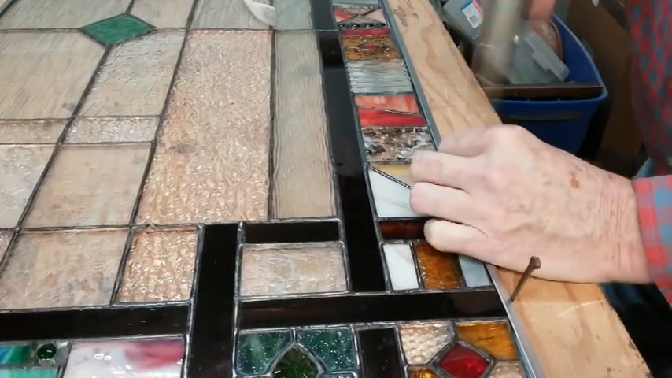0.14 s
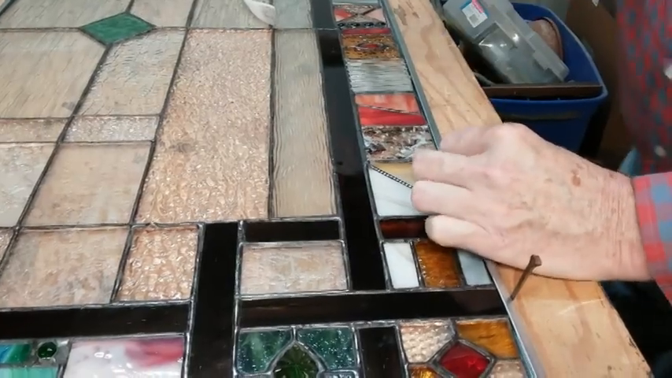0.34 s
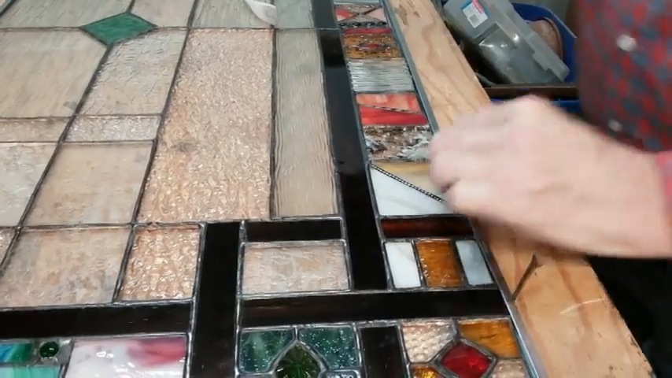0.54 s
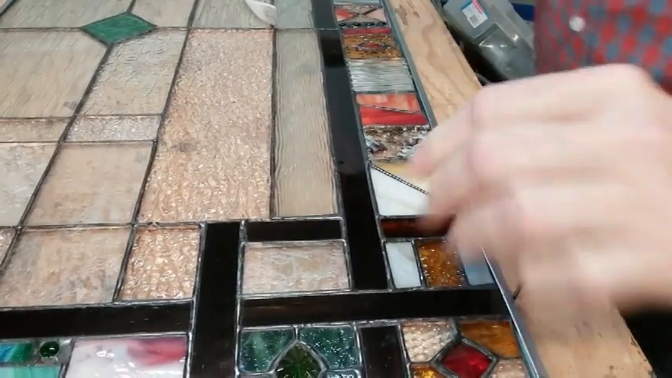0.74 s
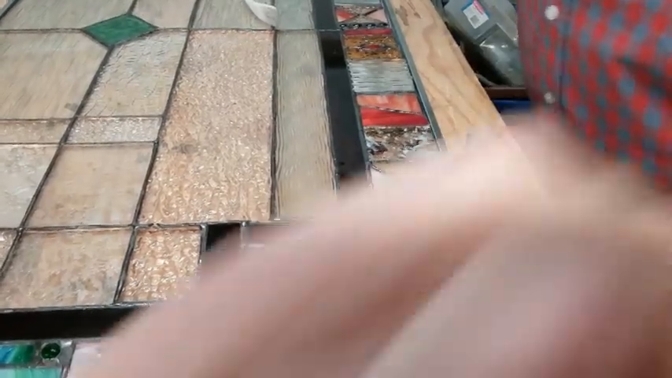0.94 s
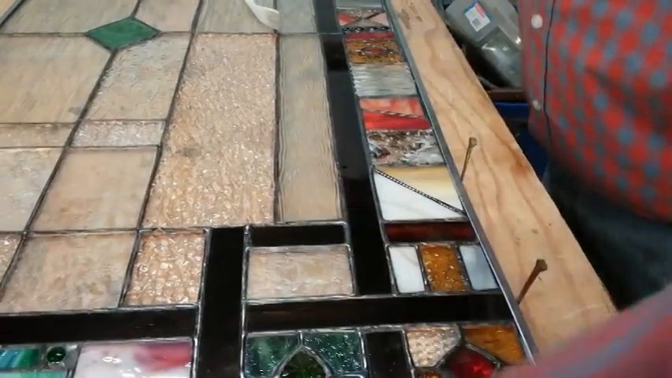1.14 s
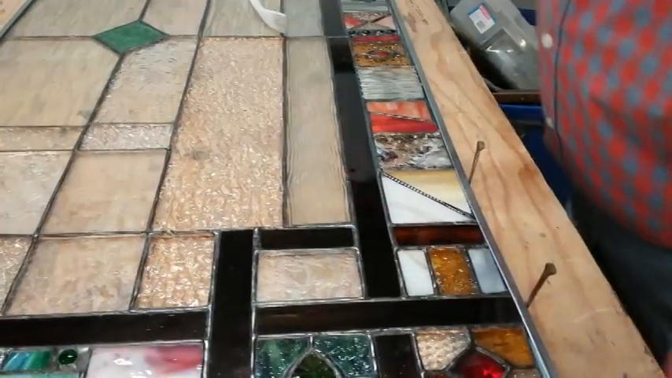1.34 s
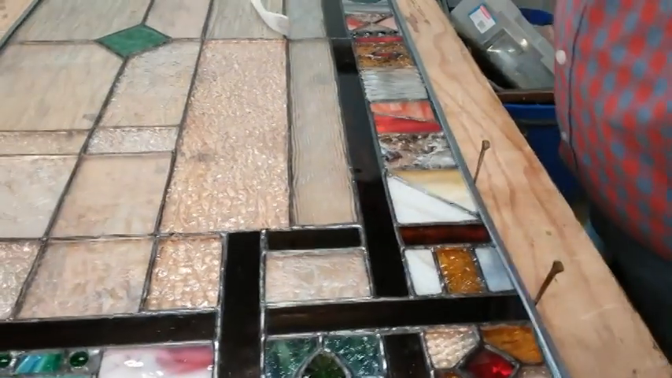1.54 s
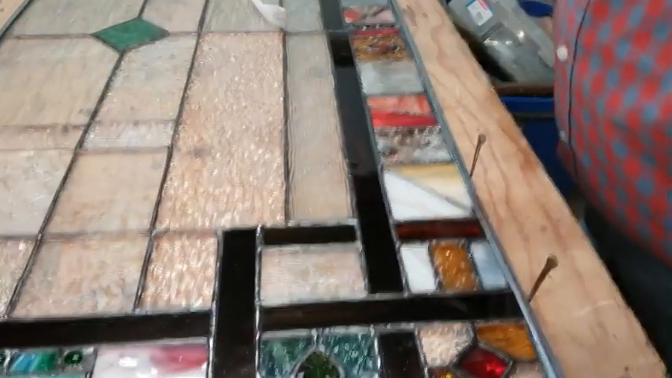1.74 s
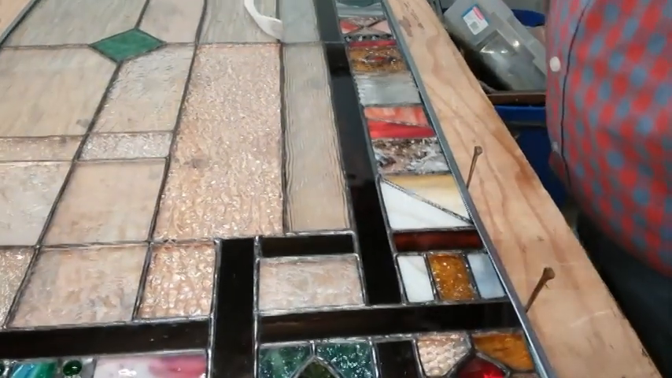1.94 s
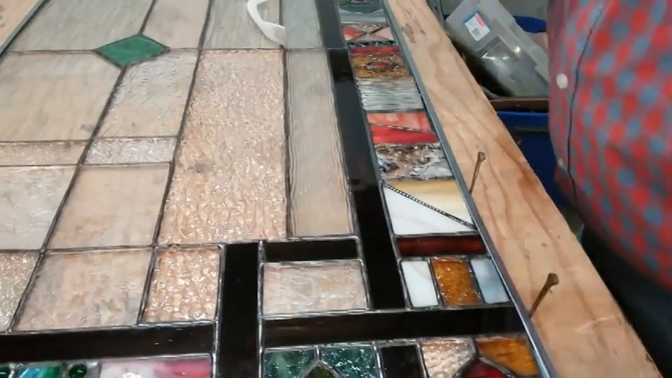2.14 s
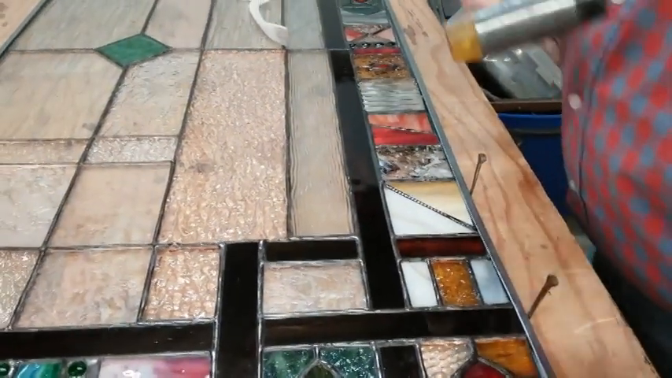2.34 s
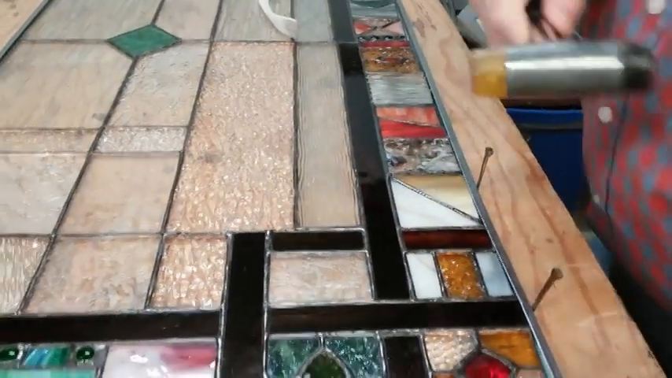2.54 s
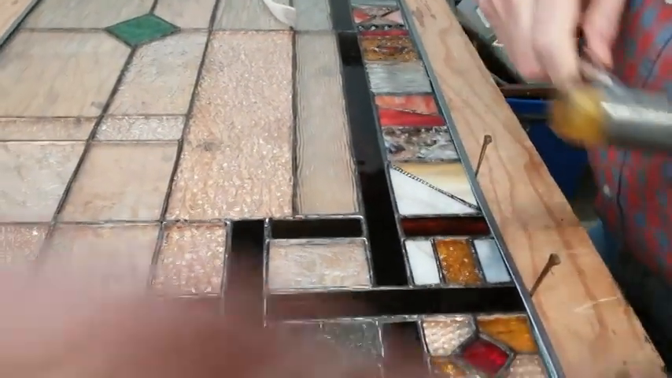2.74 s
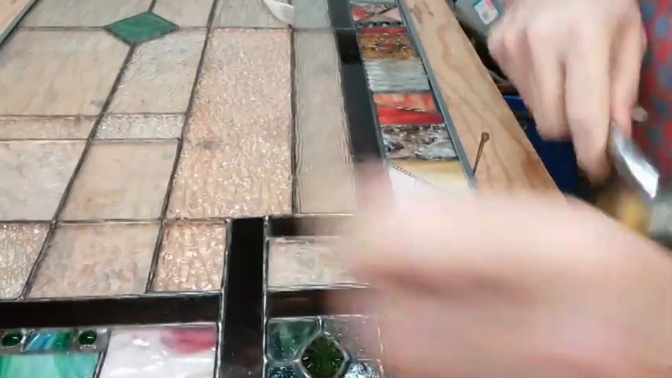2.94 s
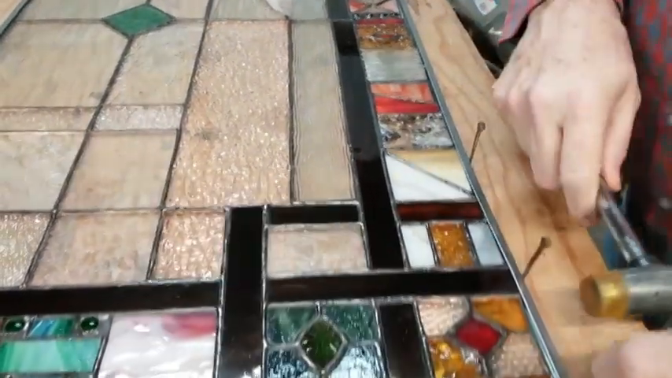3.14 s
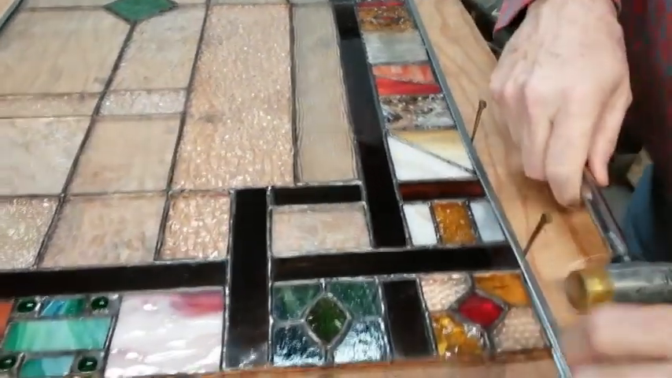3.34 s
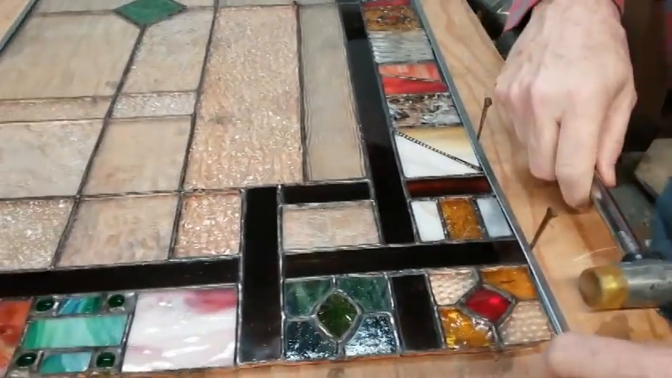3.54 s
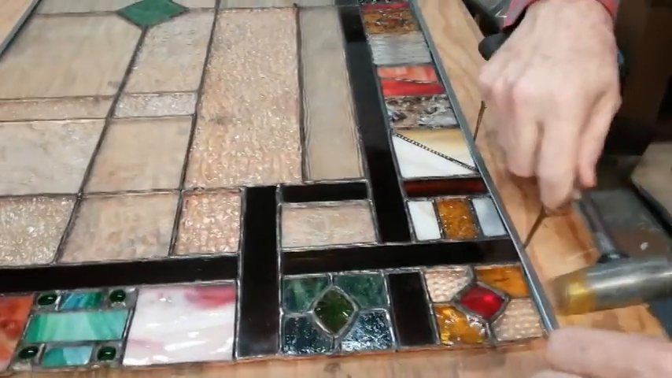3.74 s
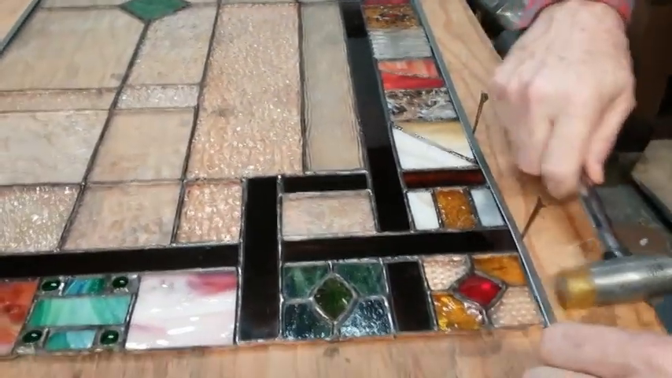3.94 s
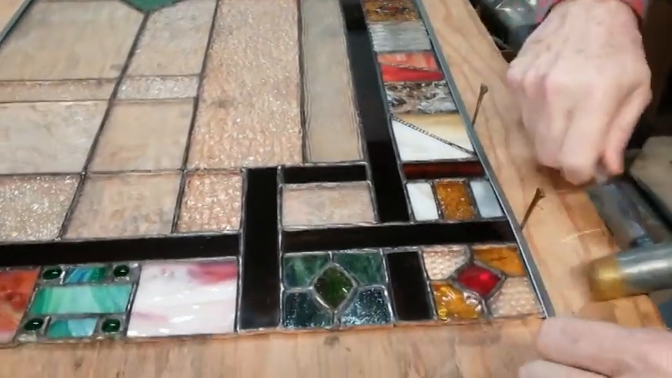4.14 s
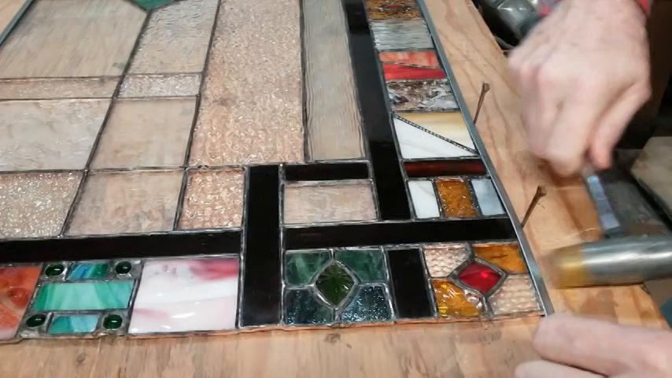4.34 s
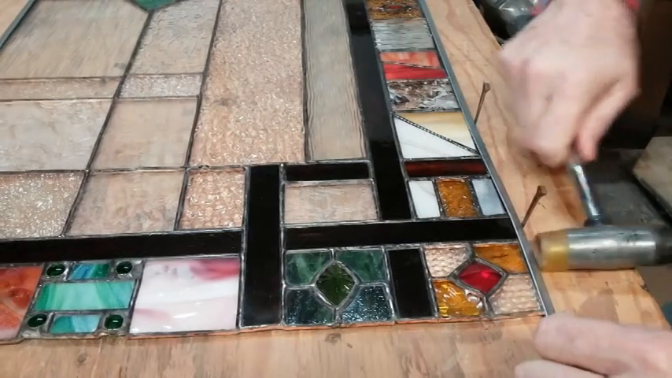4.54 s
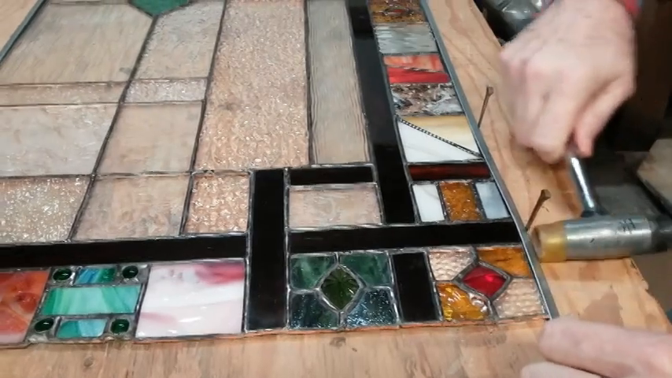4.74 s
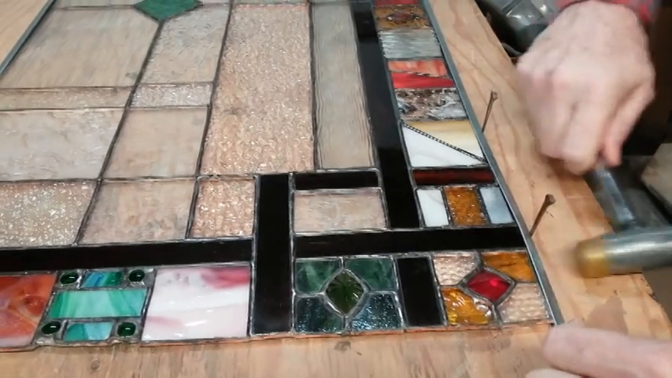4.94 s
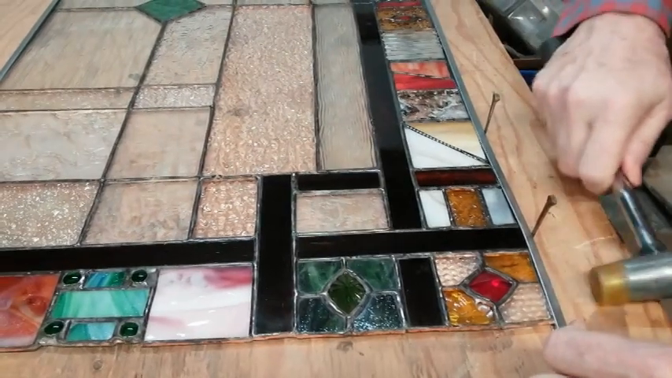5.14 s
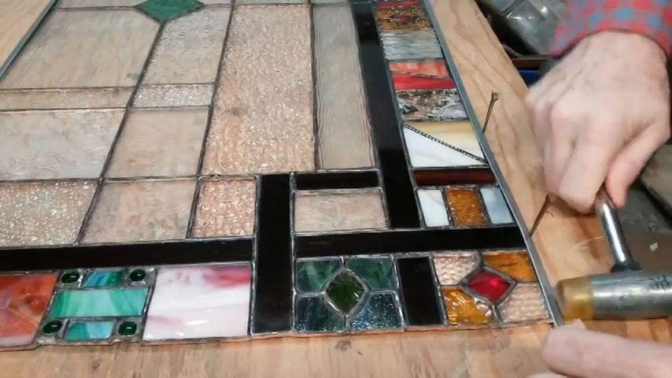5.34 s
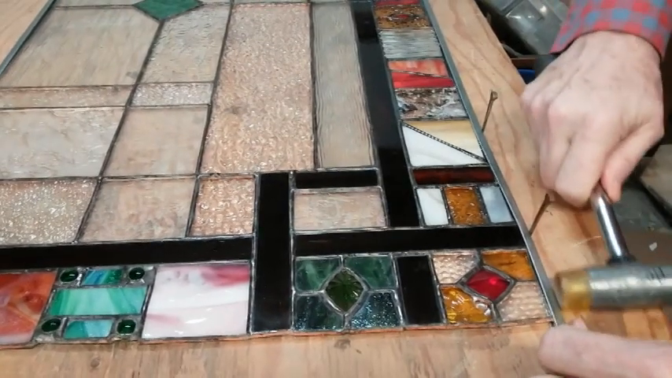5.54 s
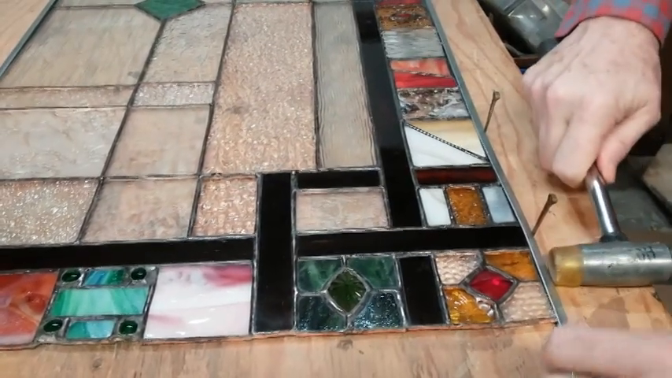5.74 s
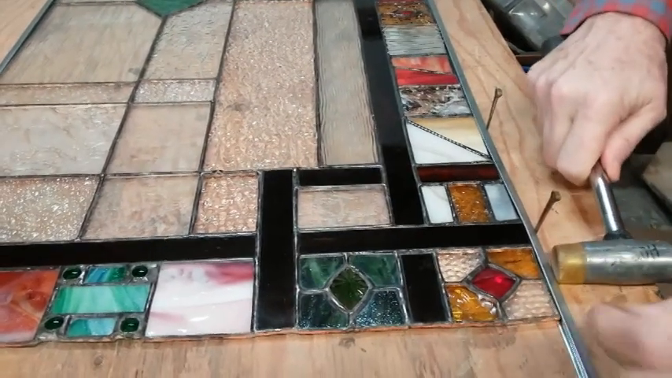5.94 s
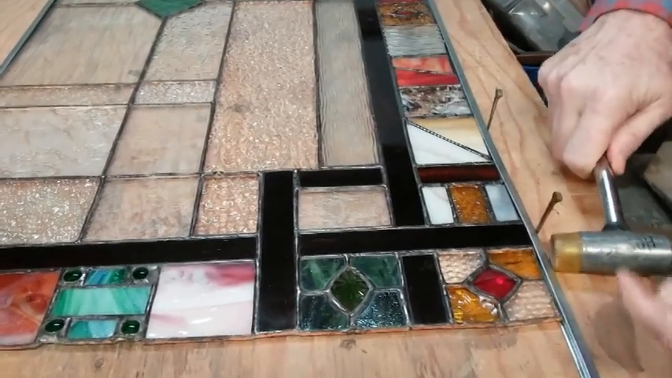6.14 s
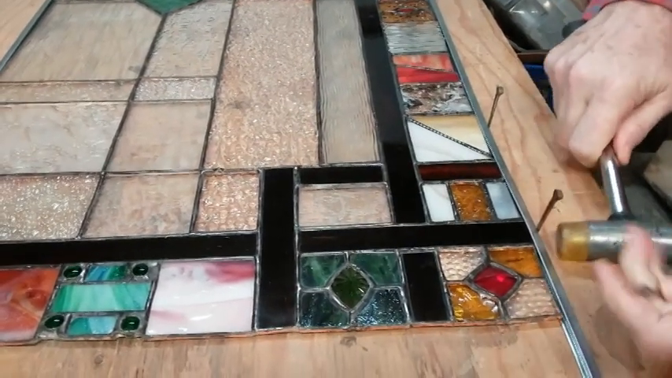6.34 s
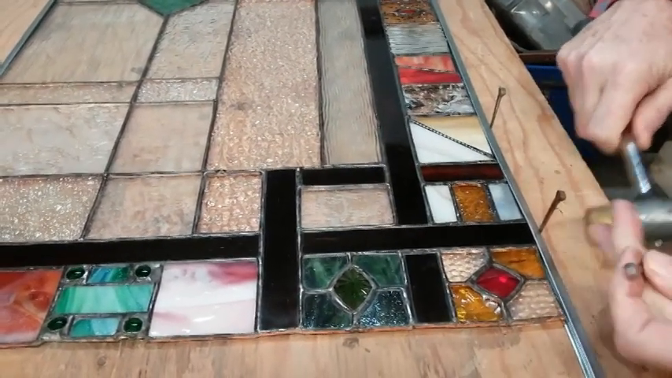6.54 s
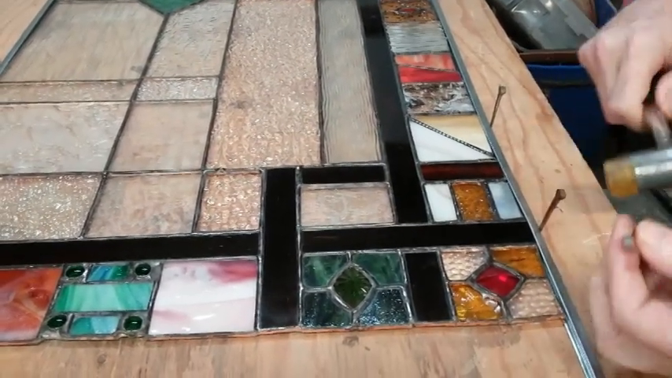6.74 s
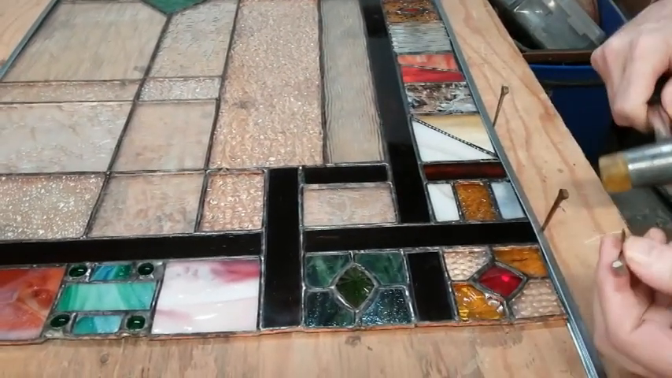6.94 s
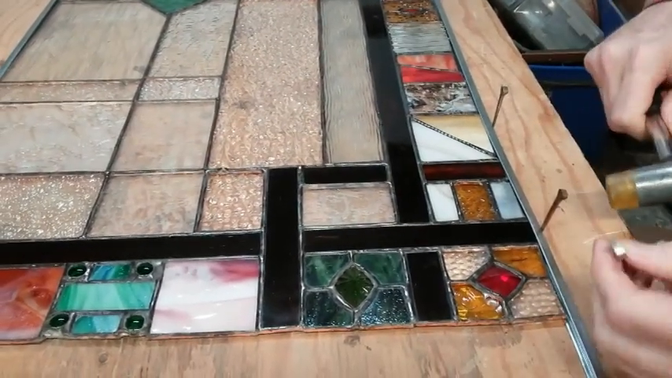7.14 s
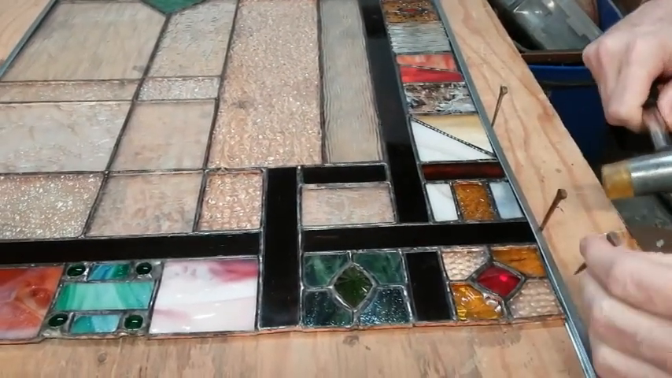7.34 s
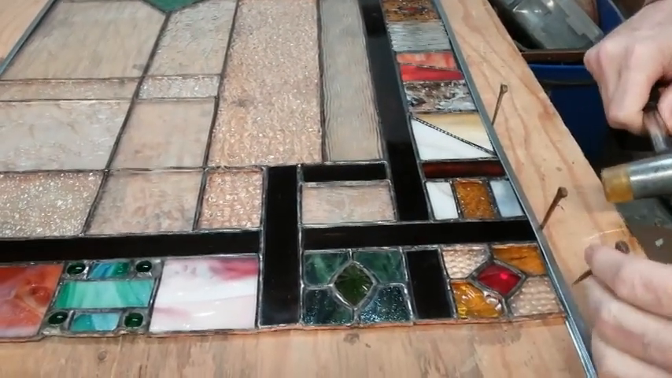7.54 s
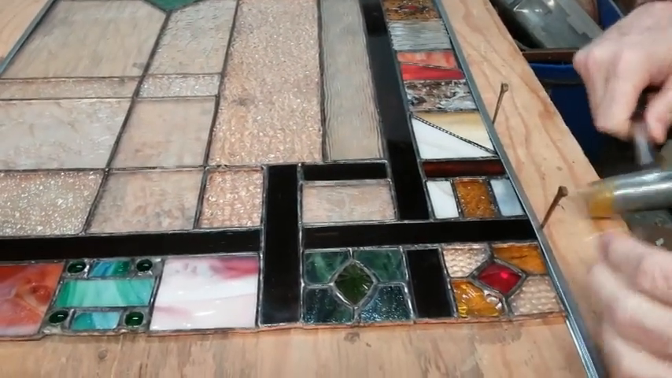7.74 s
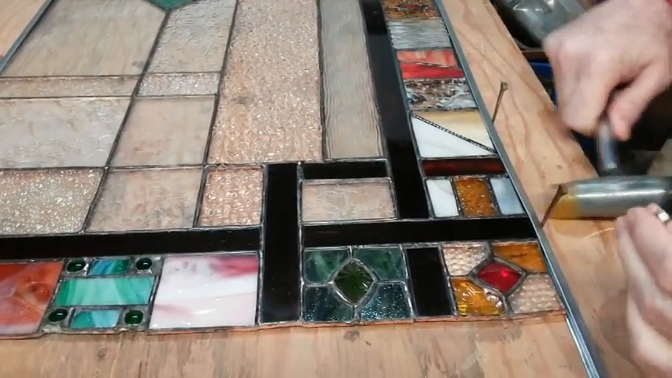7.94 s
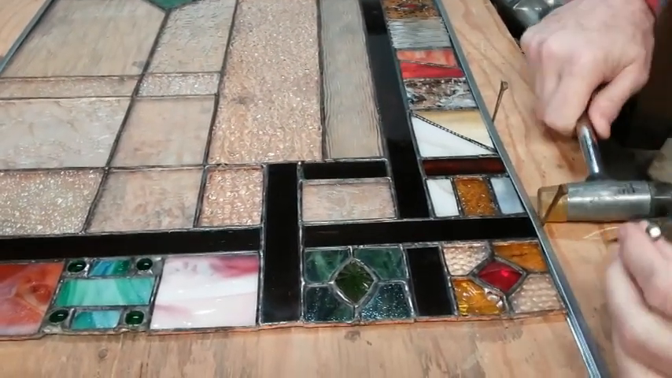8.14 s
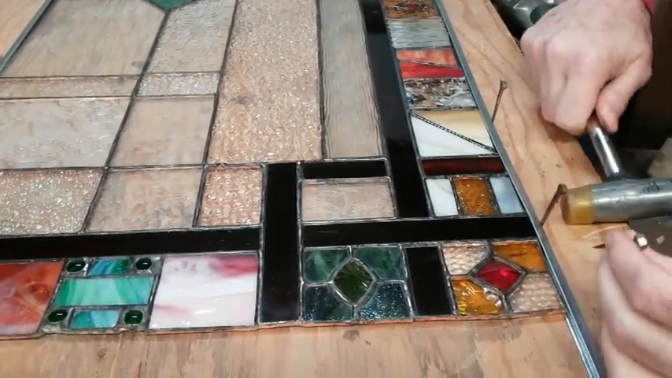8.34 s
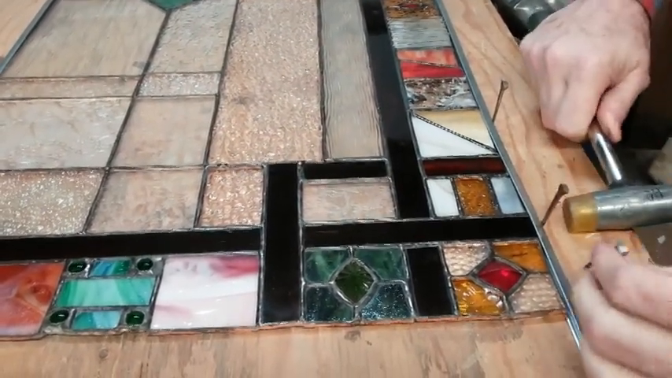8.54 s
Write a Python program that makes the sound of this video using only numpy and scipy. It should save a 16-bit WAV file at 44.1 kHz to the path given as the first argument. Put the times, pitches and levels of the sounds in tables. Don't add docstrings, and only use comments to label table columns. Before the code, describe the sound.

A workshop hums low, with hiss and a faint distant whir. At the start a hammer blow is already dying away; at 0.3 s another sharp, loud woody blow cracks close by and rings for about half a second. Faint scuffs follow until, from 1.4 to 2.5 s, a hand rummages in loose nails: dense, bright clacking, snaps and rubbing. Around 2.6-2.95 s a tool slides over wood with a brief rising scrape. Soft thuds come at 3.4 and 3.6 s, with clatter on the bench near 3.75 s. From 3.9 to 5.4 s the hammer strikes roughly every quarter second, strongest from 4.3 s, with knocks, board thuds, slight steel ticks and small bounces. From 5.5 to 6.8 s fingers fidget quietly with tools. The whir runs down around 7 s, leaving hum. Soft, dull thuds come near 7.9, 8.1 and 8.3 s amid light rubbing.

```python
import sys
import numpy as np
from scipy import signal
from scipy.fft import rfft, irfft
from scipy.io import wavfile
from scipy.ndimage import uniform_filter1d

SR = 44100
rng = np.random.default_rng(int(sys.argv[2]) if len(sys.argv) > 2 else 0)


def transcribe(u):
    v = np.clip(np.atleast_2d(u).T, -1, 1)
    q = np.round(v * 32767).astype(np.int16)
    wavfile.write(sys.argv[1], SR, q)


def to_linear_factor(level_db):
    exponent = np.asarray(level_db, float) / 20
    return 10 ** exponent


N = 379701
LEAD = SR // 5

# (frequency [Hz], density [dB per Hz])
AIR_SPECTRUM = [(15, -83.5), (25, -46.5), (58, -1), (123, -2), (174, -6.5), (194, -15.5), (255, -9),
                (382, -23.5), (449, -16.5), (791, -18.5), (1470, -21.5), (1980, -29), (5090, -44),
                (15800, -36.5)]
# (time [s], level [dB])
HUM_LEVEL = [(0, -54.5), (.7, -58.5), (1.4, -58.5), (2.3, -45.5), (3.3, -47.5), (5.7, -46.5), (6.7, -49),
             (7.85, -48.5), (8.61, -46)]
HISS_DB, HISS_WAKE_S, HISS_SAG_DB_PER_S = -3.5, 1.5, 0.62
WHIR_DB, WHIR_SAG_DB_PER_S, WHIR_STOP_S, WHIR_FADE_S = 6.5, 0.22, 7.38, 0.64
PATCHY_DB = 0.9

# (frequency [Hz], t60 [s])
ROOM_DECAY = [(100, 0.52), (300, 0.4), (1000, 0.36), (2500, 0.42), (5000, 0.35), (10000, 0.35),
              (16000, 0.25)]
# (frequency [Hz], width [Hz], added level [dB])
MIC_PORT = (4650, 420, -1)

# (frequency [Hz], level [dB], t60 [s])
BOARD_MODES = [(112.5, -18, 0.32), (168.2, -3, 0.094), (202.7, -1.5, 0.077), (272.7, -6, 0.11),
               (339.4, -3.5, 0.1), (385.8, -3, 0.063), (445.7, -8, 0.078), (547.6, -4, 0.045),
               (612.3, -7.5, 0.053), (720, -10.5, 0.044)]
# (frequency [Hz], level [dB], t60 [s])
WOOD_MODES = [(937, -1, 0.022), (1190, -3, 0.024), (1360, -5, 0.019), (1544, 5, 0.015), (1970, -1, 0.016),
              (2390, -10.5, 0.02), (2550, -22, 0.016), (3540, -30, 0.011)]
# (frequency [Hz], level [dB], t60 [s])
STEEL_MODES = [(4300, -15.5, 0.0028), (4652, -11, 0.012), (5040, -12.5, 0.0057), (5800, -14, 0.0015)]
# (frequency [Hz], level [dB], t60 [s])
EDGE_MODES = [(6830, -2, 0.008), (8540, -2, 0.011), (9150, -3.5, 0.0063), (10500, -3.5, 0.0044),
              (11440, -11.5, 0.0075), (13800, -8.5, 0.0023), (14500, -14, .002)]
# (frequency [Hz], width [Hz], level [dB])
TRAY_PEAKS = [(750, 800, 3), (1258, 120, 9.5), (2000, 650, 14), (2460, 150, -19.5), (3380, 930, -25)]
# (frequency [Hz], width [Hz], level [dB])
BENCH_PEAKS = [(75, 62, 0)]
# (share of the pitch [ratio], level [dB], t60 [s])
CLATTER_MODES = [(.25, -17.5, 0.027), (.62, 0.5, 0.0064), (.82, -21.5, 0.011), (1.01, 10, 0.0077),
                 (1.25, 3.5, 0.002), (1.45, -40.5, 0.0039)]
# (frequency [Hz], level [dB], share of the t60 [ratio])
NAIL_PARTIALS = [(3710, -7, 1.), (7660, 0, 1.), (10000, -1, .7)]
DETUNE = 0.012

# (peak time [s], rise [s], fall [s], rub level [dB], steel re rub [dB])
RUMMAGE_STROKES = [(1.48, 0.044, 0.069, -24, -15.5), (1.53, 0.036, 0.034, -22, -15.5),
                   (1.578, 0.078, 0.14, -21, -16.5), (1.674, 0.017, 0.15, -22.5, -19.5),
                   (1.81, 0.018, .15, -29.5, -13.5), (1.875, 0.099, 0.11, -25, -14.5),
                   (1.922, .04, 0.074, -17, -15), (2.08, .25, 0.12, -30, -11.5), (2.18, .2, 0.1, -30, -34),
                   (2.42, .02, 0.033, -23.5, -20), (2.468, .006, 0.078, -27, -27),
                   (2.546, 0.028, 0.21, -34, -27)]
SLIDE_STROKES = [(2.685, .18, 0.16, -29, -5.5), (2.76, 0.13, 0.19, -29.5, -3),
                 (2.81, .15, .18, -31.5, -9.5), (2.95, 0.066, 0.29, -46.5, -9.5)]
HANDLING_STROKES = [(3.44, .03, 0.069, -34.5, -13), (3.468, 0.028, 0.13, -34, -8.5),
                    (3.74, 0.21, 0.091, -36, -17), (3.782, 0.039, 0.029, -29, -8.5),
                    (3.82, 0.057, 0.24, -36, -13.5), (4.08, 0.062, .01, -37.5, -13.5),
                    (4.8, 0.1, 0.079, -38.5, -9.5)]
BRUSH_STROKES = [(5.086, 0.06, .006, -34.5, -3.5), (5.2, 0.056, .1, -32.5, -15),
                 (5.31, 0.068, 0.11, -39, -11), (5.341, 0.12, 0.005, -34, -25)]
SCUFF_STROKES = [(.56, .1, .1, -51, -13), (.854, 0.036, 0.18, -50.5, -14), (1.11, 0.043, 0.21, -49, -22),
                 (3.125, .05, 0.14, -37, -20), (3.16, 0.068, .08, -39.5, -26)]
FIDGET_STROKES = [(5.72, 0.54, 0.34, -52, -13.5), (6.02, 0.067, 0.2, -58, -10),
                  (6.08, 0.043, 0.13, -49.5, -15), (6.184, 0.089, 0.26, -45, -17),
                  (6.3, 0.11, 0.29, -62, -6), (6.444, 0.078, 0.25, -42.5, -14.5),
                  (6.56, 0.2, 0.18, -50.5, -10), (8.06, .2, 0.081, -46, -20),
                  (8.105, 0.11, 0.095, -38.5, -18), (8.22, 0.1, 0.17, -51, -16),
                  (8.34, 0.13, 0.21, -46.5, -17)]
# (edge re rub [dB], board re rub [dB], bench rumble re rub [dB],
# unevenness of the slips [dB], damping by the hand [Hz], share of the tray pitch [ratio])
RUMMAGE_TONE = (-20.5, -4.5, -10, 3, 402.5, 0.96)
SLIDE_TONE = (-7.5, -14, -9.5, 1.5, 1000., 1.76)
HANDLING_TONE = (-18.5, 5.5, -9, 3, 345, 1.09)
BRUSH_TONE = (-18.5, 7, -17.5, 2.5, 410, 1.2)
SCUFF_TONE = (-22, -12, -20, -0.5, 600.5, 0.76)
FIDGET_TONE = (-21, 4, -12, 2.5, 123, 1.03)
SWELL_DB = 30.0
RUB_TILT_DB = -7
# (time [s], pitch [Hz], level [dB])
SCRAPE_PATH = [(2.59, 900, -50), (2.64, 1090, -41), (2.67, 2250, -38), (2.705, 2760, -42),
               (2.727, 2100, -46), (2.74, 1830, -35), (2.79, 1950, -37), (2.86, 2052, -48.5),
               (2.92, 2000, -62)]
SCRAPE_WIDTH_HZ, SCRAPE_GRAIN_DB = 640, 1.5

# (time [s], clack level [dB], pitch [Hz], steel re clack [dB])
NAIL_CLACKS = [(1.441, -38, 1200, -15.5), (1.4533, -27.5, 1810, -15), (1.480, -17, 2080, -19.5),
               (1.516, -23.5, 2080, -11), (1.5265, -4, 2170, -19), (1.558, -15, 2170, -6),
               (1.598, -13.5, 1920, -16), (1.670, -13.5, 2510, -5.5), (1.6765, -14, 1930, -6.5),
               (1.755, -30, 2250, -8.5), (1.81, -16, 2110, -19.5), (1.823, -24.5, 2000, 0.5),
               (1.8385, -18.5, 2410, -15.5), (1.8801, -8, 2240, -10.5), (1.905, -13, 2320, -2),
               (1.937, -12, 2420, -14.5), (2.083, -17, 1950, -7), (2.0959, -23, 1490, -9),
               (2.16, -10.5, 2310, -11.5), (2.2, -12, 1560, -21.5), (2.283, -44, 2500, 2),
               (2.386, -36.5, 2470, -2), (2.414, -23, 1270, -34), (2.479, -26, 2000, -12),
               (2.523, -17.5, 2130, -17)]
BENCH_TOUCHES = [(0.869, -44, 1900, -19), (1.091, -38, 1890, -16), (3.115, -32, 1810, -26),
                 (3.47, -19, 2580, -27), (3.693, -25, 1390, -31), (3.727, -28.5, 1480, -26),
                 (3.756, -19, 1820, -26), (3.775, -14.5, 2000, -25), (3.824, -25.5, 1510, -35),
                 (6.009, -40, 2100, -15), (6.076, -32, 1780, -30), (6.189, -34.5, 1210, -18),
                 (6.726, -48, 1710, -24)]
NAIL_SNAPS = [(1.51, -33.5, 2600, -0.5), (1.64, -26.5, 2900, -3), (1.652, -40, 2860, 0),
              (1.692, -39.5, 2677, -1), (1.717, -35, 2900, 0), (1.828, -34, 2800, 3),
              (1.872, -15.5, 2300, -21.5), (1.881, -10.5, 2856, -2.5), (1.92, -17, 2340, -10.5),
              (2.015, -40, 2500, -2.5), (2.171, -24, 2650, -1), (2.206, -35.5, 2400, -6),
              (2.461, -12.5, 1960, -21.5), (2.524, -26, 2560, -21), (2.952, -40, 2800, 5)]
DULL_TICKS = [(1.485, -19.5, 2000, -14), (1.491, -32, 2000, -15), (1.511, -22, 2300, -8),
              (1.523, -17.5, 2100, -3.5), (1.531, -10, 2000, -17.5), (1.546, -19.5, 1900, -16),
              (1.554, -21.5, 2200, 2), (1.5625, -11.5, 2250, -8), (1.574, -13.5, 2130, -13),
              (1.585, -16.5, 2000, -6), (1.594, -15.5, 2000, -15), (1.603, -15, 2000, -15.5),
              (1.617, -23.5, 2000, -14), (1.624, -23, 1900, -8), (1.684, -19.5, 1280, -10.5),
              (1.689, -21, 1300, -4.5), (1.700, -23.5, 2000, -10), (1.731, -26, 2000, -12),
              (1.745, -31, 2000, -1.5), (2.419, -21, 1170, -18), (1.86, -20, 2420, -14.5),
              (1.869, -18, 2280, -14.5), (1.8755, -15, 2180, -10.5), (1.8905, -11, 2090, -15),
              (1.899, -14, 2140, -9.5), (1.9098, -7, 2300, 5.5), (1.9176, -12, 1300, 9),
              (1.928, -11, 2320, -7), (1.959, -20, 1900, -10.5), (3.679, -30, 1500, -16.5),
              (3.704, -35, 1500, -17), (3.742, -25.5, 1590, -23), (3.781, -15, 1870, -19),
              (3.828, -31, 1800, -24), (2.085, -28, 2000, -6), (2.164, -17, 2600, -6),
              (2.170, -22, 2760, -10), (2.176, -28, 2690, -8), (2.182, -28, 2400, -11.5),
              (2.202, -27, 1700, -6), (2.484, -22, 1400, -15), (2.527, -29, 2720, -16.5)]
# (cluster length [s], edge level [dB], edge per steel [dB per dB],
# edge brightness [dB per octave], crack re edge [dB])
CLACK_TONE = (-0.1, -13.5, 0.67, 11, -4.5)
TOUCH_TONE = (-1, -20, 0.2, -19, -15)
SNAP_TONE = (-0.3, 1.5, 1.1, 9, -3.5)
TICK_TONE = (-0.17, -16.5, 1, 0, -4.5)
# (time [s], level [dB], t60 scale [ratio], share of the pitch [ratio])
NAIL_PINGS = [(1.577, -37, .08, 1.01), (1.902, -24, .06, 1.01), (2.074, -33, 0.059, .99),
              (2.175, -49, .1, 1.02), (2.463, -47, 0.2, .995), (2.415, -58, 0.045, .99),
              (3.756, -50.5, .08, .87), (3.766, -50, .1, 0.79), (3.83, -54, .15, 0.82),
              (1.543, -39, .04, 1.68), (1.556, -40, .05, 1.36), (2.412, -43, .03, 1.33),
              (6.2, -50, 0.013, 1.2)]

# (time [s], knock level [dB], board thud re knock [dB], steel tick re knock [dB], room level [dB])
HAMMER_BLOWS = [(0.283, -0.5, -6, -24, -1), (3.4269, -37.5, 15.5, -30, -5.5), (3.6154, -17.5, 2.5, -20, -7),
                (3.874, -24, 5.5, -16, -4.5), (4.087, -11.5, -2, -21, -8), (4.3055, -3, -3, -49, -6),
                (4.3400, -3.5, -6.5, -9, -4), (4.5487, -21.5, 5.5, -36, -4), (4.582, -2.5, -4, -10.5, -5.5),
                (4.628, -11, -2.3, -41, -6), (4.8228, -5, 0, -14.5, -4.5), (4.866, -15, -4, -40, -12.5),
                (5.0033, -29.5, 8, -30.5, 0), (5.0895, -3, -1, -12, -6.5), (5.129, -29, 8, -27, -2),
                (5.3433, -7, 3, -9.5, -8), (5.3851, -20, 6, -35, -22), (7.9054, -35, 20, -30, -7),
                (7.933, -50, 31, -35, -12), (7.951, -55, 28.5, -34, -7.5), (8.1228, -36.5, 16, -29, -4),
                (8.1491, -27.5, 7, -33, -4), (8.304, -41, 14, -29, -1)]
# (knock level [dB], thud re knock [dB], tick re knock [dB], room [dB])
FIRST_TAIL = (-11.5, 5, -22, -1)
FIRST_TAIL_S = -0.09
# (until [s], thud brightness [dB per octave],
# share of the ring time [ratio], favoured frequency [Hz], its lift [dB])
BOARD_PLACES = [(1.5, 2.5, 0.67, 280, 5), (4.0, 0.5, 0.6, 330, 1), (4.2, -4.5, .67, 294, 2),
                (4.45, 0.5, 0.59, 710, 4), (4.7, -0.5, 0.63, 330, 0.5), (4.95, -0.4, 0.62, 330, 2.5),
                (5.2, -1, 0.67, 340, 4.5), (6.5, -1.5, 0.69, 297, 3.5), (8., 1.5, .45, 406, 3),
                (9.5, 0, 0.44, 250, 5)]
PLACE_OPENNESS = [0.5, -1.5, -1.5, -2, 0.5, 0, -0.3, 1.2, 1, -1]
BLOW_EDGE_DB, EDGE_PER_TICK, EDGE_PER_KNOCK = -15, 0.64, -0.2
BLOW_CRACK_DB = -6.5


def evened(x):
    return x / np.sqrt(np.mean(x ** 2) + 1e-20)


def read(points, hz):
    f, value = np.transpose(points)
    return np.interp(np.log(hz + 1), np.log(f + 1), value)


def add(mix, s, sound):
    part = mix[LEAD + round(s * SR):][:len(sound)]
    part += sound[:len(part)]


def tilted(modes, tilt_db):
    lowest_hz = modes[0][0]
    return [(hz, db + tilt_db * np.log2(hz / lowest_hz), t60) for hz, db, t60 in modes]


def favoured(modes, top_hz, lift_db):
    return [(hz, db + lift_db * np.exp(-(np.log(hz / top_hz) / 0.25) ** 2), t60) for hz, db, t60 in modes]


def broad(modes, least_hz):
    return [(hz, least_hz + np.log(1000) / (np.pi * t60), db) for hz, db, t60 in modes]


def ring(modes, luck, stretch=0.94, linger=0.7, rise=0.00035, size=2500):
    hz, db, t60 = np.transpose(modes)[:, :, None]
    t = np.arange(size) / SR
    tune, weight = luck[:2 * len(modes)].reshape(2, -1, 1)
    decay = to_linear_factor(db + 3.2 * weight - 60 * t / (t60 * linger))
    waves = decay * np.sin(2 * np.pi * hz * stretch * (1 + DETUNE * tune) * t)
    sound = waves.sum(0) * (1 - np.exp(-t / rise))
    return sound / abs(sound).max()


def crack(luck, fade_s):
    burst = (luck - np.roll(luck, shift=2)) * np.exp(-np.arange(len(luck)) / SR / fade_s)
    return np.pad(burst / abs(burst).max(), (0, 2500 - len(luck)))


def spread(sound, share=0.2):
    total = np.cumsum(abs(rfft(sound, 4096)) ** 2)
    bins = np.arange(len(total)) + 1.0
    above = np.interp(bins * (1 + share), bins, total)
    below = np.interp(bins / (1 + share), bins, total)
    power = (above - below) / bins
    click = np.roll(irfft(np.sqrt(power)), 100)[:200] * np.hanning(200)
    return click * np.linalg.norm(sound) / np.linalg.norm(click)


def background():
    frames, hz = N // 256 + 5, np.fft.rfftfreq(1024, 1 / SR)
    a, b, patches = rng.standard_normal((frames, 513, 3)).T
    patches = uniform_filter1d(patches, size=10, axis=0)
    patches = evened(uniform_filter1d(patches, size=14, axis=1))
    colour = (a + 1j * b) * to_linear_factor(read(AIR_SPECTRUM, hz)[:, None] + PATCHY_DB * patches)
    scale = np.std(signal.istft(colour, nperseg=1024, noverlap=768)[1])

    t = np.arange(frames) * 256 / SR
    hum_db = np.interp(t, *np.transpose(HUM_LEVEL))
    awake = np.clip((t - HISS_WAKE_S) / 0.3, 0, 1)
    hiss_db = HISS_DB + awake * (1.5 - HISS_SAG_DB_PER_S * (t - HISS_WAKE_S))
    running = np.clip((WHIR_STOP_S - t) / WHIR_FADE_S, 0, 1)
    whir_db = (WHIR_DB - WHIR_SAG_DB_PER_S * t) * running

    hiss_band = (hz ** 2 / (hz ** 2 + 4500.0 ** 2))[:, None]
    whir_band = np.exp(-(np.log(hz / 2300.0 + 1e-9) / 0.25) ** 2)[:, None]
    level = to_linear_factor(hum_db + hiss_band * hiss_db + whir_band * whir_db)
    return signal.istft(colour * level, nperseg=1024, noverlap=768)[1][:N] / scale


def room(x):
    out, turn = np.zeros(len(x)), np.arange(len(x)) / SR * 1.304
    for k in range(3):
        taps = np.zeros(SR)
        at = np.arange(20, SR - 20, 20)
        taps[at + rng.integers(0, 20, len(at))] = rng.choice([-1.0, 1.0], len(at))
        hz, t, z = signal.stft(taps, SR, nperseg=512)
        tail = signal.istft(z * to_linear_factor(-60 * t / read(ROOM_DECAY, hz)[:, None]), SR, nperseg=512)[1]
        tail = tail * (1 - np.exp(-np.arange(len(tail)) / SR / 0.0038))
        share = np.sqrt(2 / 3) * np.cos(np.pi * (turn + k / 3))
        out = out + signal.fftconvolve(x * share, tail / np.linalg.norm(tail))[:len(x)]
    return out


def port(x):
    hz, width, db = MIC_PORT
    x = x + to_linear_factor(db) * signal.lfilter(*signal.iirpeak(hz, hz / width, fs=SR), x)
    return signal.sosfilt(signal.butter(2, 15000.0, fs=SR, output="sos"), x)


def shake(noise, grains, peaks):
    out = np.zeros(len(noise))
    for k, (hz, width, db) in enumerate(peaks):
        r = np.exp(-np.pi * width / SR)
        pole = [1, 0, -1, 1, -2 * r * np.cos(2 * np.pi * hz / SR), r * r]
        slips = grains * np.roll(noise, shift=k * 3001)
        out = out + to_linear_factor(db) * evened(signal.sosfilt([pole, pole], slips)[:len(noise)])
    return evened(out)


def stroke(noise, rise, fall, rub_db, steel_db, edge_db, board_db, bench_db, grain_db, grip_hz, share):
    t = np.arange(-rise, fall, 1 / SR)
    bumps, slips = noise[:, :len(t)]
    grains = to_linear_factor(grain_db * evened(uniform_filter1d(bumps, size=60)))
    grains = grains / np.sqrt(uniform_filter1d(grains ** 2, size=4000) + 1e-12)
    tray = [(hz * share, width + 0.3 * grip_hz, db) for hz, width, db in TRAY_PEAKS]
    edges = broad(tilted(EDGE_MODES, RUB_TILT_DB), 600.0 + 2.2 * grip_hz)
    parts = [(0, tray), (steel_db, broad(STEEL_MODES, grip_hz)), (edge_db, edges),
             (board_db, broad(BOARD_MODES, 44.0)), (bench_db, BENCH_PEAKS)]
    sound = sum(to_linear_factor(db) * shake(slips, grains, peaks) for db, peaks in parts)
    swell_db = -SWELL_DB * np.maximum(-t / rise, t / fall)
    return to_linear_factor(rub_db - 7.5 + swell_db) * sound


def scrape():
    s, hz, db = np.transpose(SCRAPE_PATH)
    t = np.arange(s[0], s[-1], 1 / SR)
    bumps, slips = rng.standard_normal((SR, 2))[:len(t)].T
    slips = slips * to_linear_factor(SCRAPE_GRAIN_DB * evened(uniform_filter1d(bumps, size=90)))
    turn = np.exp(2j * np.pi * np.cumsum(np.interp(t, s, hz)) / SR)
    r = np.exp(-np.pi * SCRAPE_WIDTH_HZ / SR)
    low = signal.lfilter([1 - r], [1, -r], slips / turn)
    low = signal.lfilter([1 - r], [1, -r], low)
    return s[0], to_linear_factor(np.interp(t, s, db)) * evened((turn * low).real)


def rubbing():
    out = np.zeros(N + LEAD)
    kinds = [(RUMMAGE_STROKES, RUMMAGE_TONE), (SLIDE_STROKES, SLIDE_TONE),
             (HANDLING_STROKES, HANDLING_TONE), (BRUSH_STROKES, BRUSH_TONE),
             (SCUFF_STROKES, SCUFF_TONE), (FIDGET_STROKES, FIDGET_TONE)]
    for rows, tone in kinds:
        for (s, rise, *row), noise in zip(rows, rng.standard_normal((len(rows), 2, SR))):
            add(out, s - rise, stroke(noise, rise, *row, *tone))
    add(out, *scrape())
    return out


def clacks():
    near, far = np.zeros((2, N + LEAD))
    kinds = [(NAIL_CLACKS, CLACK_TONE), (BENCH_TOUCHES, TOUCH_TONE),
             (NAIL_SNAPS, SNAP_TONE), (DULL_TICKS, TICK_TONE)]
    rows = [(*row, *tone) for table, tone in kinds for row in table]
    for row, luck in zip(rows, rng.standard_normal((len(rows), 4, 900))):
        s, db, hz, steel_db, length, edge_db, follow, tilt_db, crack_db = row
        contacts = luck[3] ** 3 * 0.21 * np.exp(-np.arange(900) / SR / max(length, 0.001))
        contacts[0] = 0.93
        edge = ring(tilted(EDGE_MODES, tilt_db), luck[2]) + to_linear_factor(crack_db) * crack(luck[2], 0.00097)
        clatter = ring(CLATTER_MODES, luck[0], hz)
        steel = to_linear_factor(steel_db) * ring(STEEL_MODES, luck[1], stretch=0.98)
        sound = signal.fftconvolve(clatter + steel + to_linear_factor(edge_db + follow * steel_db) * edge, contacts)
        sound = to_linear_factor(db - 1.0) * sound / abs(sound).max()
        add(near, s, sound)
        add(far, s, to_linear_factor(-15.5) * spread(sound))
    for (s, db, t60, share), luck in zip(NAIL_PINGS, rng.standard_normal((len(NAIL_PINGS), 6))):
        ping = ring(NAIL_PARTIALS, 0.18 * luck, stretch=share, linger=t60, size=2700)
        add(near, s, to_linear_factor(db) * ping)
    return np.array([near, far])


def board_place(s):
    for (until, *place), open_db in zip(BOARD_PLACES, PLACE_OPENNESS):
        if s < until:
            return (*place, open_db)


def hammer():
    near, far = np.zeros((2, N + LEAD))
    rows = [(FIRST_TAIL_S, *FIRST_TAIL), *HAMMER_BLOWS]
    for row, luck in zip(rows, rng.standard_normal((len(rows), 5, 200))):
        s, db, thud_db, tick_db, room_db = row
        tilt_db, linger, top_hz, lift_db, open_db = board_place(s)
        edge_db = BLOW_EDGE_DB + EDGE_PER_TICK * tick_db + EDGE_PER_KNOCK * db

        board = favoured(tilted(BOARD_MODES, tilt_db), top_hz, lift_db)
        thud = ring(board, luck[0], linger=linger, rise=0.0043, size=14000)
        thud = to_linear_factor(db + thud_db + 2.5) * thud
        wood = -ring(WOOD_MODES, luck[1], rise=0.00055)
        tick = to_linear_factor(tick_db) * ring(STEEL_MODES, luck[2], stretch=1.001, linger=0.27)
        edge = to_linear_factor(edge_db) * ring(EDGE_MODES, luck[3], linger=0.4)

        rattle = luck[4, ::-1] * np.hanning(200) ** 0.6
        buzz = signal.fftconvolve(tick + edge, rattle / np.linalg.norm(rattle))[:len(wood)]
        knock = wood + buzz + to_linear_factor(edge_db + BLOW_CRACK_DB) * crack(luck[3], 0.0013)
        chatter = 0.34 * luck[4] * np.exp(-np.arange(200) / SR / 0.0013)
        chatter[0] = 1
        knock = signal.fftconvolve(knock, chatter / np.linalg.norm(chatter))

        add(near, s, thud)
        add(near, s, to_linear_factor(db + 3.5) * knock)
        add(far, s, to_linear_factor(room_db + 1.0) * thud)
        to_walls = spread(wood + to_linear_factor(-2.0) * tick + edge)
        add(far, s, to_linear_factor(db + 4.5 + room_db + open_db) * to_walls)
    return np.array([near, far])


def scene():
    near, far = hammer() + clacks()
    rub = rubbing()
    wet = room(far + to_linear_factor(-6.5) * rub)
    return (port(near + rub + wet)[LEAD:] + background())[None]


def low_pass(x):
    return signal.sosfilt(signal.butter(12, 15950, fs=SR, output="sos"), x)


def record(dry):
    x = signal.sosfilt(signal.butter(4, 60.0, "high", fs=SR, output="sos"), dry)
    power_db = 10 * np.log10(uniform_filter1d(x[0] ** 2, size=120) + 1e-12)
    fall = np.arange(N) * 90.0 / SR
    held_db = np.maximum.accumulate(power_db + fall) - fall
    over_db = np.maximum(held_db - 3, 0)
    x = x / to_linear_factor(1.8 * uniform_filter1d(over_db, size=60))
    x = x / 1.15 / (1 + x ** 4) ** 0.25
    treble_cut = signal.firwin(255, 16200, window=("kaiser", 9), fs=SR)
    x = signal.oaconvolve(x, treble_cut[None], "same")
    return low_pass(1.15 * x)


dry = scene()
out = record(dry)
transcribe(out)
```